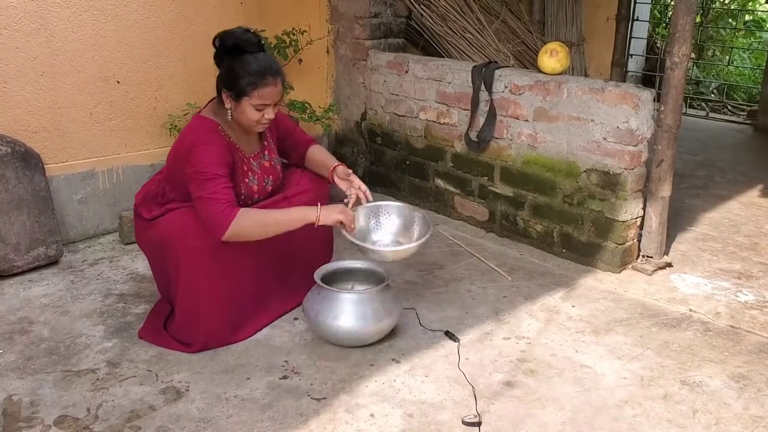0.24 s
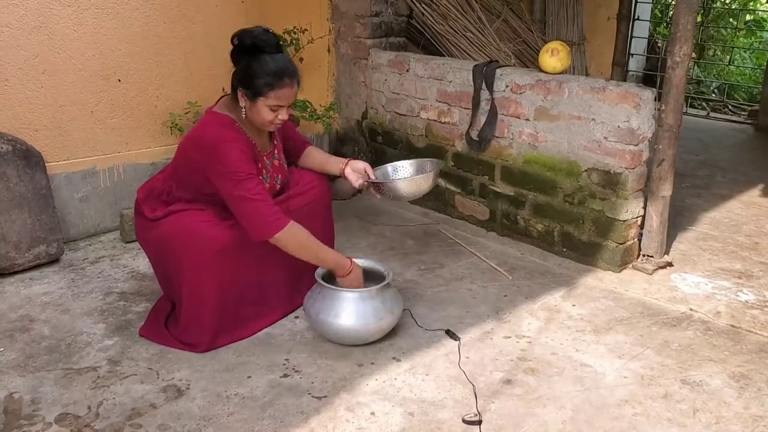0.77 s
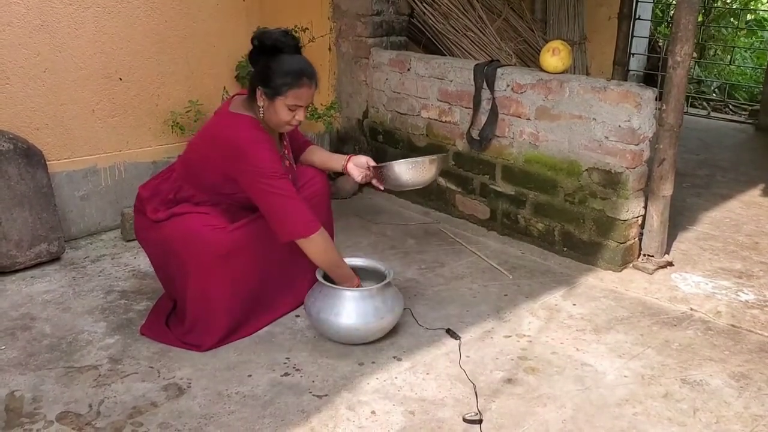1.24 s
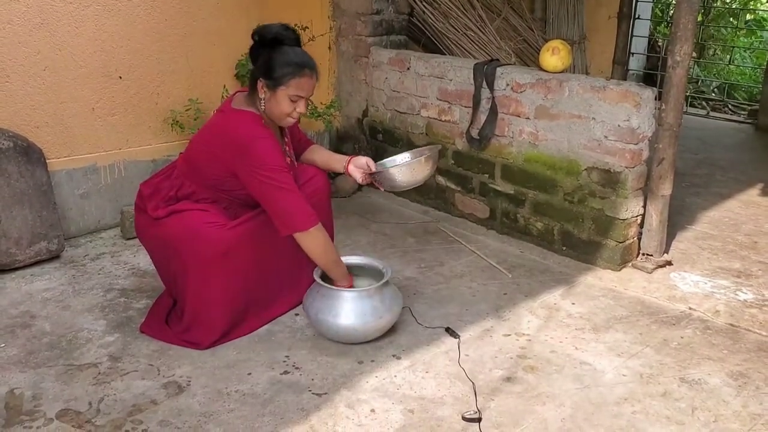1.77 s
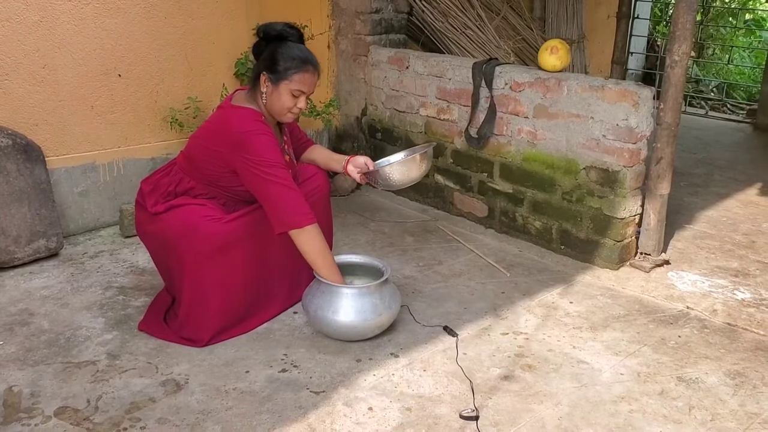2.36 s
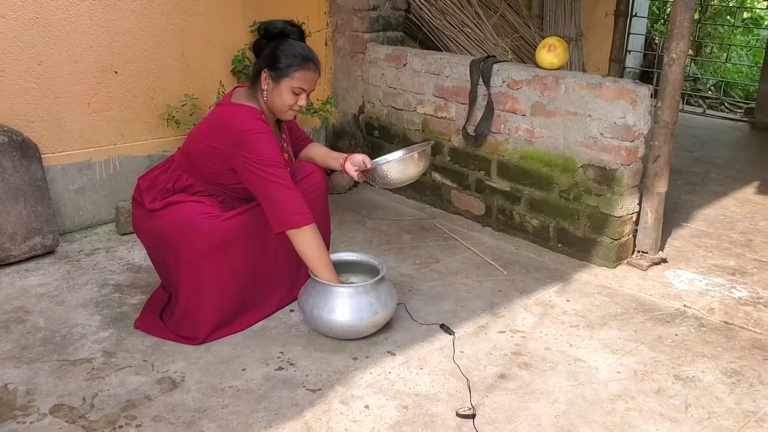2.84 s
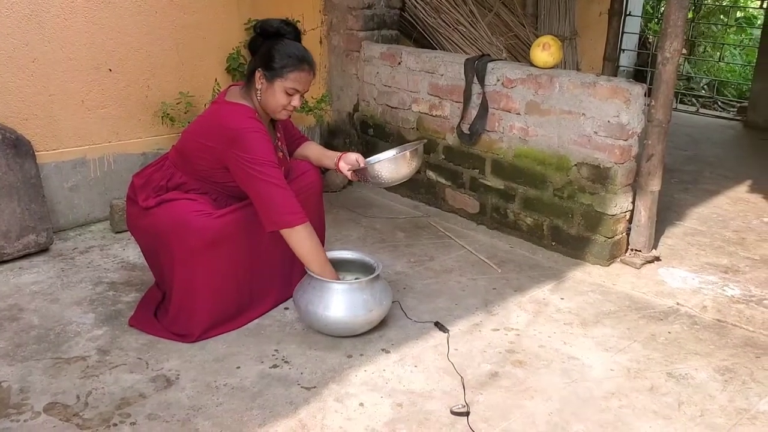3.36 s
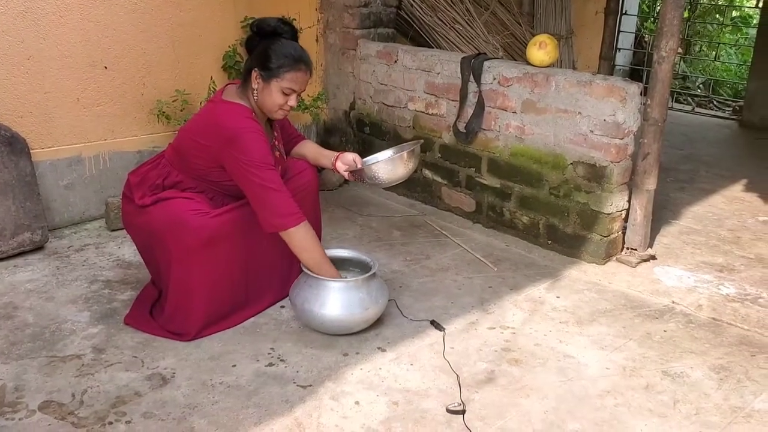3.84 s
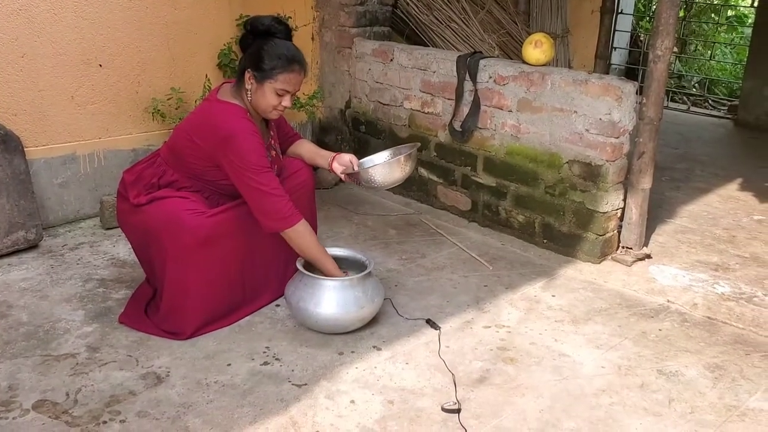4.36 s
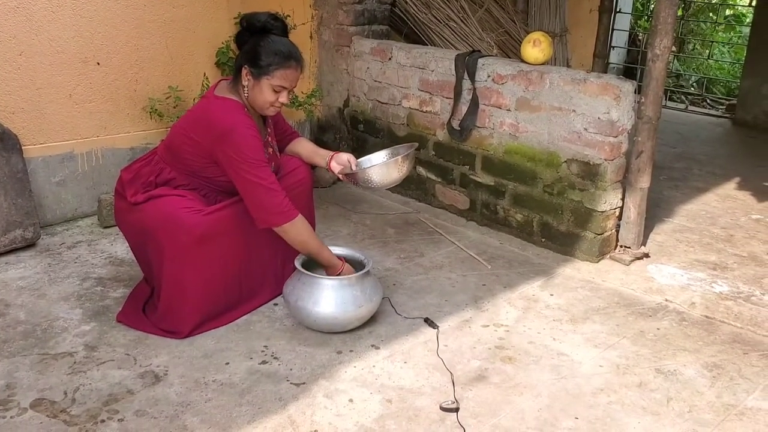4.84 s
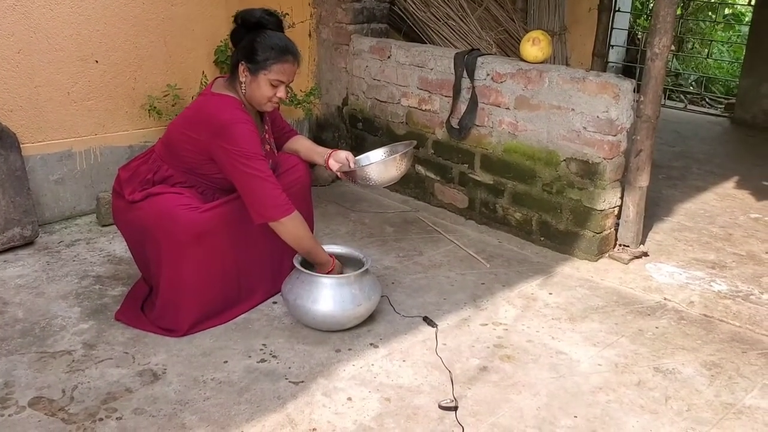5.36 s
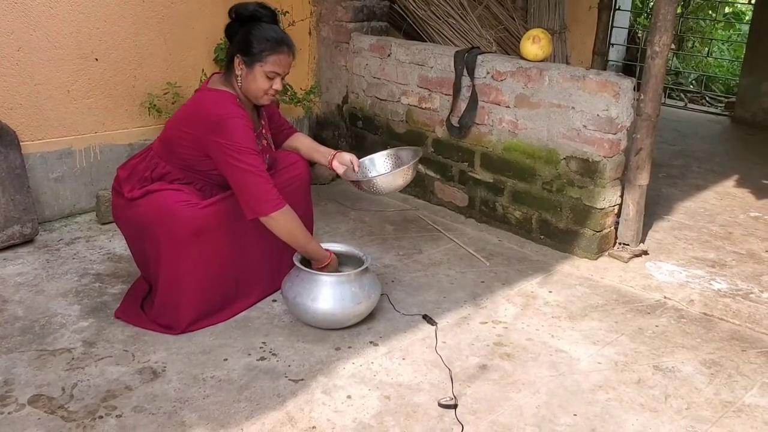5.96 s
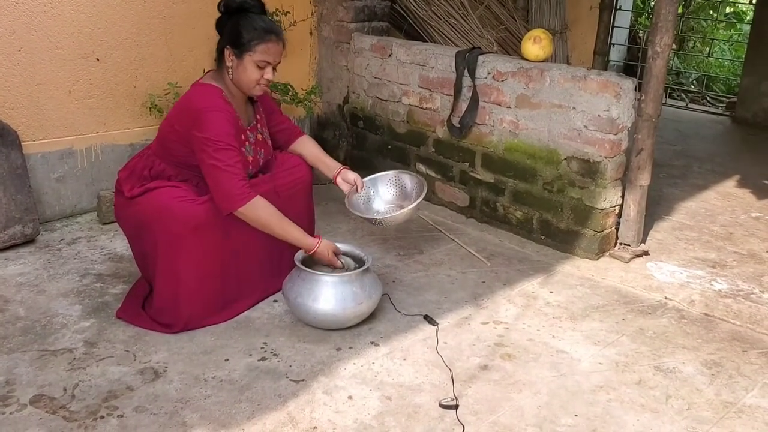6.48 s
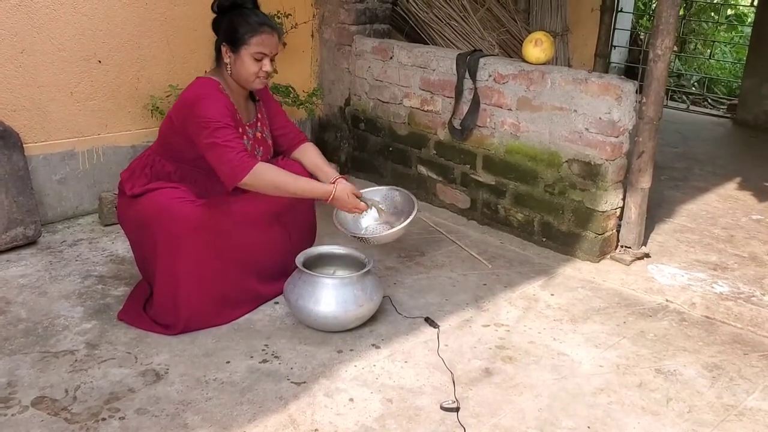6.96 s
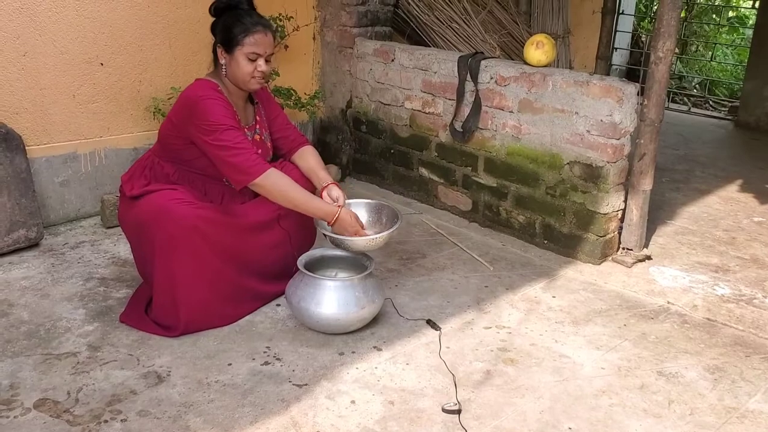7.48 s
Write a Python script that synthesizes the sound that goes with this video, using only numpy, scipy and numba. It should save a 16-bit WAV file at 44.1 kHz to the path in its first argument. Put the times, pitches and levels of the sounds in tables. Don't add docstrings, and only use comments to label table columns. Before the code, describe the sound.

Close to a small microphone on a yard floor, a thin steel colander rings as it is lifted, with a bubbly plink. After a quiet second, fish thrash loudly in a metal pot, pause, then thrash again. Splashing dwindles to gurgles and drips; a bangle clinks and scrapes the rim. A low motor hums far off, a bird chirps faintly, and the loaded colander taps softly at the end.

```python
import sys
import numpy as np
from scipy import signal
from scipy.fft import rfft, irfft
from scipy.io import wavfile
from scipy.ndimage import uniform_filter1d, map_coordinates
from numba import njit

SR = 44100
rng = np.random.default_rng(int(sys.argv[2]) if len(sys.argv) > 2 else 0)


def transcribe(signal):
    frames = np.atleast_2d(signal).T
    limited = np.clip(frames, -1, 1)
    pcm = np.round(limited * 32767).astype(np.int16)
    wavfile.write(sys.argv[1], SR, pcm)


def boost_factor(decibels):
    exponent = np.asarray(decibels, float) / 20
    return 10 ** exponent


N = 340421
T = np.arange(N) / SR

# start in seconds, peak level in dB, centre of the spray in Hz, mist in dB relative to the slap.
FIRST_BOUT = [(1.463, -35, 2502, -30), (1.488, -20, 2740, -26.5), (1.51, -15, 3600, -24),
              (1.533, -8.5, 2940, -16.5), (1.57, -5.5, 2840, -20), (1.589, -7.5, 3307, -19),
              (1.613, -9, 3587, -13.5), (1.633, -10, 3540, -17.5), (1.6803, -15.5, 2590, -12.5),
              (1.715, -12, 3200, -19.5), (1.7532, -26, 2594, -21.5), (1.7946, -13, 2763, -26.5),
              (1.846, -29, 3580, -15.5), (1.876, -11.5, 3470, -12.5), (1.8933, -22.5, 7380, -9),
              (1.932, -18, 2675, -18), (1.9657, -13, 2520, -9), (2.035, -15.5, 3680, -15),
              (2.0456, -18, 2640, -9), (2.0724, -10, 2855, -11.5), (2.1118, -15.5, 2500, -14.5),
              (2.1322, -18, 3850, -18), (2.2384, -19.5, 3540, -19), (2.301, -26, 2700, -17),
              (2.3391, -27.5, 2780, -20)]
SECOND_BOUT = [(3.251, -38, 2830, -16.5), (3.277, -26.5, 4300, -22), (3.304, -20.5, 6190, -14),
               (3.325, -18.5, 2500, -27), (3.346, -17, 3956, -20.5), (3.36, -5.5, 2700, -26.5),
               (3.385, -13, 3200, -16.5), (3.4375, -23.5, 5270, -18), (3.4456, -24.5, 4730, -17.5),
               (3.547, -16, 2578, -8), (3.5751, -14.5, 2560, -14), (3.631, -13.5, 6300, -9),
               (3.654, -12, 2670, -11), (3.6991, -20, 4093, -13), (3.7556, -15, 2760, -22.5),
               (3.779, -18.5, 2550, -7.5), (3.8095, -16.5, 4696, -20), (3.927, -21, 2580, -24),
               (3.9516, -20.5, 3780, -19), (3.89, -40, 9500, -2), (4.0174, -24.5, 4500, -27.5),
               (4.0284, -12, 3620, -23.5), (4.0659, -17, 3480, -15), (4.0761, -35.5, 3260, -26),
               (4.157, -36.5, 4360, -26.5), (4.2133, -33, 2600, -21), (4.2665, -33, 2510, -18),
               (4.343, -27.5, 2910, -23), (4.3998, -30.5, 6370, -15.5)]
DROPS = [(0.412, -29.5, 2900, -14), (.51, -41.5, 6100, -2), (2.641, -38, 4800, -19.5),
         (2.444, -27.5, 2580, -22), (5.1193, -29.5, 3280, -32), (5.3334, -24, 3464, -36),
         (7.623, -30, 3300, -19), (7.632, -32.5, 4700, -18)]

# start in seconds, peak level in dB, pitch in Hz.
LARGE_BUBBLES = [(1.512, -20, 470), (1.536, -4, 626), (1.564, -13.5, 380), (1.77, -18, 628),
                 (1.93, -23.5, 600), (2.074, -13, 354), (2.159, -18.5, 363), (3.365, -18, 438),
                 (3.382, -7, 333), (3.413, -10, 350), (3.467, -6, 431), (3.584, -17, 525),
                 (4.051, -22.5, 376), (4.518, -22, 426), (5.205, -26.5, 410)]
MIDDLE_BUBBLES = [(1.475, -18.5, 866), (1.537, -0.5, 1620), (1.585, -11.5, 1600), (1.622, -6, 1250),
                  (1.63, -6, 1069), (1.731, -16.5, 1630), (1.776, -12.5, 741), (1.881, -14.5, 1410),
                  (2.003, -27, 1200), (2.043, -14, 1230), (2.069, -15.5, 763), (2.446, -16.5, 1426),
                  (3.329, -17, 1240), (3.36, -6, 1900), (3.384, -8, 1744), (3.468, -12.5, 750),
                  (3.497, -18.5, 730), (3.542, -4.5, 1440), (3.579, -19.5, 725), (3.625, -17, 830),
                  (3.732, -21.5, 1340), (3.764, -23, 800), (3.863, -22.5, 742), (3.938, -22, 780),
                  (4.026, -24, 880), (4.84, -20.5, 828), (5.11, -23.5, 847), (5.32, -23.5, 1450),
                  (5.321, -18.5, 1980)]
SMALL_BUBBLES = [(1.0892, -36.5, 2110), (1.501, -16.5, 2880), (1.5765, -8, 2510), (1.603, -1.5, 2550),
                 (1.657, -11.5, 4600), (1.6708, -7.5, 2090), (1.7051, -7, 2440), (1.7738, -21, 2300),
                 (1.795, -13, 2440), (1.9322, -11.5, 2800), (1.9924, -11, 2470), (2.0366, -7.5, 1730),
                 (2.0744, -5, 1900), (2.1139, -8.5, 2320), (2.2387, -19, 1830), (2.3014, -17.5, 2240),
                 (2.449, -19, 2340), (2.5022, -22.5, 2630), (3.256, -25, 2370), (3.2981, -11, 2155),
                 (3.4346, -15, 1890), (3.5138, -15.5, 3150), (3.5501, -12, 2198), (3.609, -10.5, 1960),
                 (3.6563, -12, 2690), (3.7657, -7.5, 2340), (3.9253, -25, 2040), (3.9905, -6, 2384),
                 (4.0283, -18, 3840), (5.0041, -15.5, 2440), (5.0442, -23, 1980), (5.3078, -29, 3060),
                 (5.308, -29, 2180)]
DRIPS = [(2.637, -39, 4800), (2.658, -32.5, 1756), (2.688, -33.5, 2670), (4.158, -27.5, 4450),
         (4.2417, -30, 2240), (4.2693, -30, 2000), (4.341, -22, 3070), (.357, -35.5, 2300),
         (4.5246, -27, 2150), (4.69, -36, 860), (4.415, -33.5, 900), (4.8676, -29.5, 1980),
         (5.0254, -29, 1420), (0.18, -24, 1400), (5.4915, -42, 1600)]
BEADS = [(3.236, -46, 2335), (3.306, -20.5, 6630), (3.306, -23.5, 5470), (3.365, -6, 2910),
         (3.372, -18, 4700), (3.455, -17, 4680), (3.468, -22, 3480), (3.811, -12, 2210), (1.787, -21, 2310),
         (1.956, -19, 2170), (2.057, -15, 806), (2.166, -17.5, 1760), (2.252, -23.5, 3680),
         (4.049, -14.5, 2570), (4.08, -16, 3240), (4.144, -34, 857), (4.166, -28, 1980), (4.18, -31, 2020),
         (4.243, -34.5, 1290), (4.318, -26, 2900), (4.302, -37, 875), (4.33, -35, 820), (4.378, -39, 890),
         (4.352, -41, 840), (4.441, -42, 835), (4.57, -34.5, 3870), (.48, -45, 1150), (.671, -45, 1190),
         (7.466, -32.5, 430), (7.632, -37.5, 1020)]
GURGLES = [(4.184, -31.5, 450), (4.243, -38, 307), (4.269, -38, 383), (4.517, -25, 447), (4.671, -37, 220),
           (4.691, -36.5, 495), (4.831, -41, 740), (4.858, -31, 236), (5.017, -37.5, 250),
           (5.099, -37, 221), (5.206, -28, 432), (5.3, -39, 441), (5.336, -29.5, 258), (5.405, -39, 256)]
GULPS = [(1.548, -19, 280), (1.772, -26, 340), (2.3, -20, 410), (4.9, -29, 330), (3.7, -30, 255),
         (3.332, -23, 890), (3.35, -21, 760), (3.393, -12.5, 2000), (3.49, -14, 400), (2.2, -9, 2100),
         (2.085, -22.5, 580), (3.763, -17, 1050), (3.955, -33.5, 5300), (.003, -14.5, 2230),
         (0.045, -20, 2200)]
SPITS = [(1.366, -57, 8630), (1.5702, -20, 11390), (1.594, -22.5, 12800), (1.648, -22, 11720),
         (1.734, -30, 10200), (1.964, -15.5, 8270), (3.3667, -19.5, 13900), (3.386, -21.5, 13610),
         (3.557, -21, 7510), (3.585, -21.5, 13680), (3.693, -24, 11790), (3.71, -23.5, 13660),
         (3.78, -23.5, 11540), (4.658, -47, 9200), (5.37, -43, 6700), (5.392, -45, 6350)]

# time in seconds, level in dB, brightness in dB per size class.
CHURN = [(1.455, -55.5, -2.5), (1.55, -12, -3), (1.72, -39.5, -1.5), (2.09, -23.5, 0), (2.25, -37, -0.5),
         (2.412, -50, -2.5), (2.641, -60.5, 3.5), (3.2, -68, 1), (3.301, -49, 1.5), (3.482, -27.5, -4.5),
         (3.882, -40.5, 0), (4.12, -46, -5), (4.302, -42.5, -6.5), (4.43, -49.5, -7.5), (4.8, -57.5, -11),
         (4.84, -52, -7.5), (5.382, -47.5, -6.5), (5.75, -67, -9.5)]
CLASS_HZ = [450, 1700, 4500, 10500]
CLASS_MIX_DB = [-4, 1.5, -1, -11.5]

# frequency in Hz, level in dB, 60 dB decay time in seconds.
POT_MODES = [(770, -6, 0.14), (803, 0, 0.14), (1190, -7, 0.22), (1240, -2, 0.16), (1600, -8.5, 0.096),
             (1730, -16, 0.14), (2090, -16, 0.32), (2233, -9, 0.11)]
COLANDER = [(710, -12, 0.4), (1053, -1, 1.6), (1111, -9.5, 1.55), (1146, -9.5, 1.5), (1240, -19.5, 1.5),
            (1351, -7.5, 0.74), (1410, -13.5, .5), (1590, -7, 1.5), (1739, -1, 0.35), (1840, -19, 0.53),
            (1950, -1, 0.54), (2010, -12, 0.28)]
CLINK = [(969, -2.5, 0.14), (1605, -2.5, 0.14), (2005, -6.5, 0.23), (2202, -7, 0.13), (2476, -16, 0.2),
         (2630, 0.5, 0.098), (3252, -12, 0.07), (3740, -9, 0.12), (4300, -14, 0.072), (5060, -9, 0.059)]
LOADED = [(1023, 1.5, 0.24), (1092, -3.5, 0.2), (1340, -2.5, 0.078), (1570, -6.5, 0.11), (1696, -4, 0.39),
          (2008, -9, .15), (2132, -2, 0.16), (2240, -3, 0.3), (2476, -10.5, 0.25), (2850, -8, .12),
          (3214, -8, 0.08), (3850, -14, 0.11), (4200, -18, .12)]
COLANDER_RIM = [(2170, -20, 0.75), (2260, 0, 0.14), (2354, -5, 0.68), (2510, -2, 0.17), (2630, -4, 0.21),
                (2940, -15, 0.43), (3060, -10, 0.4), (3144, -6, 0.3), (3200, -6.5, 0.16), (3610, -6, 0.17),
                (4060, -11, 0.27), (5160, -7, 0.1)]
LINGER = [(1095, -40.5, 1.17), (1247, -53, 1.2), (1340, -55.5, 1.9), (1900, -51, 1.6), (2210, -43, 1.2),
          (1800, -49, 1.1)]
# start in seconds, modes, level in dB, level of the faint wash in dB,
# longest ring in seconds, swell in cycles.
KNOCKS = [
    (0.0, COLANDER, -31, -47, 1.08, 0.48),
    (5.335, CLINK, -27.5, -66, 1.15, 2.7),
    (5.487, CLINK, -47, -86.5, 0.17, 3.8),
    (7.466, LOADED, -42, -71.5, .2, 5.7),
    (7.487, LOADED, -40, -64, 0.29, 5.4),
    (7.624, LOADED, -51, -68, 0.079, 4.0),
]

# centre in Hz, half width in Hz, level in dB.
SCRAPE_BANDS = [(690, 254, -13), (1620, 130, -4), (2090, 40, -1.5), (2253, 26, -1.5), (2530, 66, -4),
                (3854, 33, -5), (4330, 49, -8), (4916, 40.8, -1.5), (5750, 39, -11.5), (6500, 360, -20.5),
                (10560, 3300, -33)]
SCRAPE_S = [5.8, 5.82, 5.905, 5.945, 6.05]
SCRAPE_DB = [-64.5, -55.5, -45.5, -56, -76]
# start in seconds, frequency in Hz, length in seconds, level in dB.
RIM_TONES = [
    (5.93, 1590, 0.22, -54.5),
    (5.925, 510, .18, -60),
    (6.69, 1350, .15, -68),
    (3.03, 1260, .12, -63),
]

# start in seconds, length in seconds, low edge in Hz, high edge in Hz, level in dB.
BRUSHES = [(0.459, 0.32, 4540, 10600, -59.5), (1.082, 0.035, 1470, 7080, -59.5),
           (4.514, 0.35, 301, 4050, -48.5), (4.829, 0.32, 391, 4300, -52.5), (.0, 0.49, 247, 610, -58),
           (4.844, 0.222, 234, 490, -48), (7.464, 0.045, 245, 855.5, -46), (7.475, 0.099, 2540, 6580, -62)]
SWAYS = [(0.68, 0.88, 250, 1200, -61), (6.95, 0.58, 320, 760, -71), (0.066, 1.4, 300, 2700, -61),
         (1.12, 0.52, 3900, 6100, -65), (1.1, 0.55, 2050, 2900, -66), (2.87, 0.61, 2300, 5200, -70),
         (5.211, 0.26, 240, 760, -47), (5.7, 0.51, 1570, 4700, -72), (5.54, 3.3, 810, 1560, -72.5),
         (6.34, 0.29, 1700, 4100, -71), (0.063, 0.33, 1900, 5500, -59.5)]

# time in seconds, hum level in dB.
MOTOR_LOAD = [(0, -52.5), (1.198, -57), (1.35, -48), (3.001, -52), (3.961, -37.5), (4.131, -47.5),
              (4.3, -40), (4.97, -47.5), (5.07, -38.5), (6.251, -51), (6.799, -46.5), (7.0, -50.5)]
# frequency in Hz, density in dB per Hz.
RUMBLE_SPECTRUM = [(22, -13), (54, -7.5), (92, -4), (150, -13), (232, -21), (268, -22), (400, -32.5),
                   (520, -77)]
# start in seconds, peak level in dB.
THUDS = [(1.322, -35.5), (1.356, -33.5), (1.41, -35), (2.187, -32), (2.233, -29), (2.283, -33.5),
         (2.386, -29), (2.454, -31), (2.535, -25.5), (2.594, -27)]
# start in seconds, length in seconds, start pitch in Hz, end pitch in Hz, level in dB.
BIRD_NOTES = [
    (6.855, .045, 5450, 3700, -75),
    (6.985, .072, 5050, 2800, -66),
    (7.175, .048, 4900, 3500, -73),
]
# frequency in Hz, density in dB.
YARD_SPECTRUM = [(120, -31.5), (200, 2.5), (431, -10.5), (788, -15.5), (1410, -25.5), (4810, -34.5),
                 (5570, -37), (14700, -51)]


def level(x, db):
    return x * boost_factor(db) / np.sqrt(np.mean(x ** 2))


def band(x, lo_hz, hi_hz):
    return signal.sosfilt(signal.butter(2, [lo_hz, hi_hz], "band", fs=SR, output="sos"), x)


def coloured(spectrum):
    hz, db = np.transpose(spectrum)
    shape = np.interp(np.log(np.fft.rfftfreq(N, 1 / SR) + 1), np.log(hz), db)
    return level(irfft(rfft(rng.standard_normal(N)) * boost_factor(shape), N), 0)


def walk(rate):
    hold = int(SR / rate)
    steps = np.repeat(rng.standard_normal(N // hold + 1), hold)
    return 1.456 * uniform_filter1d(uniform_filter1d(steps, hold), hold)[:N]


def fades(s, db, rise, t60):
    kicks = np.bincount((s * SR).astype(int), boost_factor(db), N)
    fast = np.exp(-1 / (rise * SR))
    slow = 1000 ** (-1 / (t60 * SR))
    return signal.lfilter([1 - fast], np.convolve([1, -fast], [1, -slow]), kicks)


@njit
def rings(s, hz, t60, size, rise, swell):
    out = np.zeros(N)
    for k in range(len(s)):
        count, start = int(t60[k] * SR), int(s[k] * SR)
        fade = np.exp(-np.log(1000) / (count + 1))
        grow = np.exp(-hz[k] / (swell * SR))
        z, turn = 1 + 0j, np.exp(2j * np.pi * hz[k] / SR)
        glide = np.exp(2j * np.pi * hz[k] * rise[k] / SR / (count + 1))
        gap = 1.
        for i in range(start, min(start + count, N)):
            z *= turn * fade
            turn *= glide
            gap *= grow
            out[i] += size[k] * (1 - gap) * z.imag
    return out


def echo(x, t60):
    t = np.arange(int(t60 * SR)) / SR
    tail = rng.standard_normal(len(t)) * 1000 ** (-t / t60) * (t > .004)
    tail = signal.lfilter([1], [1, -.5], tail)
    return signal.fftconvolve(x, tail / np.sqrt(np.sum(tail ** 2)))[:N]


def slaps(count=90):
    s, db, centre_hz, mist_db = np.transpose(FIRST_BOUT + SECOND_BOUT + DROPS)
    spray, t = np.zeros(N + SR), T[:SR // 8]
    shape = (1 - np.exp(-t / 0.0019)) * 1000 ** (-t / 0.068)
    for at, peak_db, hz in zip(s, db, centre_hz):
        puff = band(rng.standard_normal(len(t)), hz / 1.78, hz * 1.395)
        start = int(at * SR)
        spray[start:start + len(t)] += shape * level(puff, peak_db - 10.5)
    mist_noise = level(band(rng.standard_normal(N), 6000, 14500), 0)
    mist = fades(s, db + mist_db - 6.0, 0.001, 0.035) * mist_noise

    delay_luck, pitch_luck, size_luck, ring_luck = rng.random((len(s), count, 4)).T
    late = .12 * delay_luck ** 1.3
    hz = 900 * 7.5 ** pitch_luck
    octaves_off = np.abs(np.log2(hz / (1.6 * centre_hz)))
    size = boost_factor(db - 7.5 - 150 * late - 28 * size_luck - 4.2 * octaves_off)
    t60 = (12 + 30 * ring_luck) / hz
    drops = rings((s + late).ravel(), hz.ravel(), t60.ravel(), size.ravel(), 0.15 * ring_luck.ravel(), 1.7)
    ragged = boost_factor(2.7 * walk(400))
    return ragged * (spray[:N] + boost_factor(3.6 * walk(1500) - 2.0) * mist) + drops


def bubbles(count=4):
    s, db, hz = np.transpose(LARGE_BUBBLES + MIDDLE_BUBBLES + SMALL_BUBBLES + DRIPS + BEADS + GURGLES + GULPS)
    u = rng.random((len(s), count + 1, 3)).T
    t60 = 20.95 * (hz / 1000) ** 0.55 / hz
    db = db - 1.7 * np.clip(np.log2(hz / 1200), 0, 1)
    out = rings(s, 0.9696 * hz, t60, boost_factor(db + 2.5), 0.21 * u[0, 0] + 0.087, 2.27)
    for lag, shift, luck in zip(*u[:, 1:]):
        start = s + .001 + .018 * lag ** 1.5
        out += rings(start, hz * (0.856 + .34 * shift), t60, boost_factor(db - 7.5 - 5.6 * luck), 0.25 * lag, 1.2)
    return out


def stirred():
    s, db, bright_db = np.transpose(CHURN)
    return s, [db + mix_db + (k - 1) * bright_db for k, mix_db in enumerate(CLASS_MIX_DB)]


def churn(count=18000, scatter_db=5.5, fizz_db=-3.0):
    s, db = stirred()
    time_luck, pitch_luck, size_luck, ring_luck = rng.random((count, 4)).T
    at = s[0] + time_luck * (s[-1] - s[0])
    hz = 300 * 52 ** pitch_luck ** .65
    place = np.interp(np.log(hz), np.log(CLASS_HZ), np.arange(4))
    grid = np.array([np.interp(at, s, d) for d in db])
    gust_db = 5 * np.tanh(.9 * walk(30))
    luck_db = np.minimum(-scatter_db * np.log(size_luck + 1e-9), 10.5)
    size_db = map_coordinates(grid, [place, np.arange(count)], order=1)
    size_db = size_db + luck_db + gust_db[(at * SR).astype(int)]
    size = boost_factor(size_db + fizz_db) * (hz / 2500) ** 0.52
    swarm = rings(at, hz, (1.8 + 40 * ring_luck ** 2) / hz, size, 0.1 * ring_luck, 5.33)
    edges = [250, 900, 3000, 7000, 15000]
    for k in range(4):
        hiss = level(band(rng.standard_normal(N), edges[k], edges[k + 1]), -18)
        hiss_db = np.interp(T, s, db[k], left=-150, right=-150)
        swarm = swarm + hiss * boost_factor(hiss_db + .6 * gust_db + 3.5 * walk(40))
    return swarm


def ticks(count=1600):
    s, (*_, mist_db) = stirred()
    time_luck, pitch_luck, size_luck = rng.random((count, 3)).T
    at, hz = time_luck * N / SR, 3000 * 5.6 ** pitch_luck
    db = np.maximum(np.interp(at, s, mist_db, left=-99, right=-99) + 6.0, -84.0)
    return rings(at, hz, 11.0 / hz, boost_factor(db - 3.5 * np.log(size_luck + .02)), 0 * at, 0.45)


def spits():
    s, db, hz = np.transpose(SPITS)
    out = np.zeros(N)
    for lag, ratio, less_db in ((0, 1, 0), (.0008, .84, -3), (.002, 1.1, -6)):
        out += rings(s + lag, np.minimum(hz * ratio, 15300), 30 / hz, boost_factor(db + less_db - 0.5), 0 * s, 1.2)
    return out


def pot(water):
    out = np.zeros(N)
    for hz, db, t60 in POT_MODES:
        r = 1000 ** (-1 / (t60 * SR))
        poles = [1, -2 * r * np.cos(2 * np.pi * hz / SR), r * r]
        out += boost_factor(db) * signal.lfilter([np.sqrt(1 - r)], poles, water) * hz / SR
    return out * boost_factor(-5)


def colander(count=500):
    faint_hz = 1750 + 14000 * rng.random(count) ** 2
    out = np.zeros(N)
    for s, modes, knock_db, wash_db, longest, swell in KNOCKS + [(0.0, COLANDER_RIM, -28, -57, 0.6, .3)]:
        hz, db, t60 = np.transpose(modes)
        t60 = np.clip(t60, .05, longest)
        far = 1 - .02 * (.6 + .8 * rng.random(len(hz)))
        near_share = -.8 * np.minimum(1055 / hz, 1) ** 3
        for ratio, share in ((1, 1), (1 + 0.0037, near_share), (far, .22)):
            out += rings(s + 0 * hz, hz * ratio, t60, share * boost_factor(knock_db + db), 0 * hz, swell + 0.12)
        lag, luck_db = np.array([[.004], [-8]]) * rng.random((count, 2)).T
        faint = boost_factor(wash_db - 6.76 * np.log2(faint_hz / 2000) + luck_db)
        faint_t60 = 0.72 * longest * (faint_hz / 2000) ** -.75
        out += rings(s + lag, faint_hz, faint_t60, faint, 0 * faint, swell + .1)
    hz, db, t60 = np.transpose(LINGER)
    grip_s, grip_t60_s = 0.21, 0.37
    grip = np.where(T < 2, 1000 ** (-np.clip(T - grip_s, 0, .1) / grip_t60_s), 1)
    return out * grip * boost_factor(2.0 * walk(70)) + rings(0 * hz, hz, t60, boost_factor(db), 0 * hz, 1.4)


def rim():
    drag_db = np.interp(T, SCRAPE_S, SCRAPE_DB, left=-150, right=-150)
    rub = rng.standard_normal(N) * boost_factor(drag_db + 2.2 * walk(70))
    out = sum(boost_factor(db + 9.5) * band(rub, hz - width - 45, hz + width + 45) for hz, width, db in SCRAPE_BANDS)
    for s, hz, length, db in RIM_TONES:
        shape = np.sin(np.pi * np.clip((T - s) / length, 0, 1) ** 0.55)
        out += boost_factor(db) * shape * np.sin(2 * np.pi * hz * T)
    return out


def rustles():
    out = np.zeros(N)
    grain = rng.standard_normal(N) * boost_factor(2.5 * walk(45))
    for patches, peak in ((BRUSHES, 0.015), (SWAYS, 0.28)):
        for s, length, lo_hz, hi_hz, db in patches:
            part = slice(int(s * SR), int((s + length) * SR))
            shape = np.interp(T[part] - s, [0, peak * length, length], [0, 1, 0])
            rub = band(band(grain[part], lo_hz, hi_hz), lo_hz, hi_hz)
            out[part] += shape * level(rub, db + 0.5)
    return out


def motor():
    s, load_db = np.transpose(MOTOR_LOAD)
    hum_db = np.interp(T, s, load_db)
    turns = np.cumsum(85.7 * (1 + 0.01 * walk(4.5))) / SR
    hum = np.sqrt(2) * boost_factor(hum_db - 4.0 + 0.5 * walk(3.3)) * np.sin(2 * np.pi * turns)
    at, db = np.transpose(THUDS)
    thuds = rings(at, 151.0 + 0 * at, 0.041 + 0 * at, boost_factor(db + 4.5), -1.3 + 0 * at, 0.45)
    slow_db = uniform_filter1d(hum_db, int(0.42 * SR)) - hum_db.mean()
    rumble = band(coloured(RUMBLE_SPECTRUM), 32, 900) * boost_factor(-49.5 + 0.54 * slow_db)
    return hum + thuds + rumble


def bird():
    out, drop_s = np.zeros(N), .03
    for s, length, start_hz, end_hz, db in BIRD_NOTES:
        u = np.clip((T - s) / length, 0, 1)
        hz = start_hz + (end_hz - start_hz) * u ** (length / drop_s)
        hz = hz * (1 - .1 * (1 - u) ** 3 + 0.01 * walk(60))
        out += boost_factor(db) * np.sin(np.pi * u) * np.sin(2 * np.pi * np.cumsum(hz) / SR)
    return out + boost_factor(4.0) * echo(out, .33)


def yard_air():
    return coloured(YARD_SPECTRUM) * boost_factor(-60.5 + 1.6 * walk(2.7))


def scene():
    big = bubbles()
    water = slaps() + big + churn() + ticks() + spits()
    steel = colander()
    near = water + pot(water + 1.8 * big) + steel + rim()
    yard = boost_factor(-12.5) * echo(near - steel / 2, 0.29)
    return (near + yard + rustles() + motor() + bird() + yard_air())[None]


def top_cut(x):
    return signal.sosfilt(signal.butter(12, 15940, fs=SR, output="sos"), x)


def record(dry):
    soft = np.tanh(0.86 * dry) / 0.56 + boost_factor(-82) * rng.standard_normal(N)
    soft = signal.sosfilt(signal.ellip(6, .3, 60, 15700, fs=SR, output="sos"), soft)
    return top_cut(soft)


dry = scene()
out = record(dry)
transcribe(out)
```